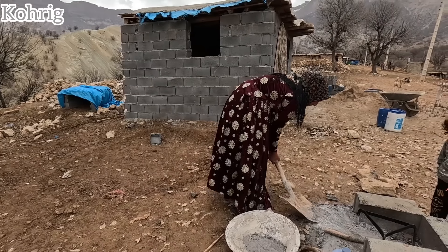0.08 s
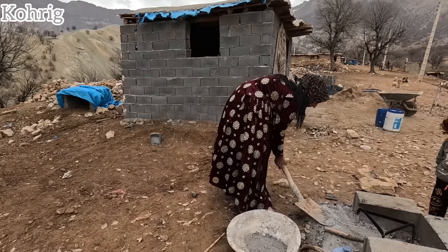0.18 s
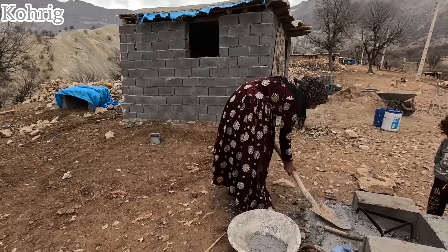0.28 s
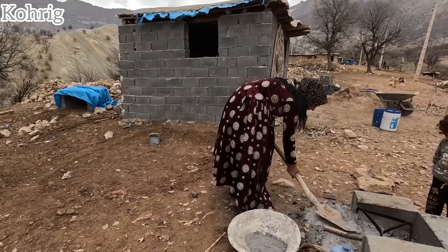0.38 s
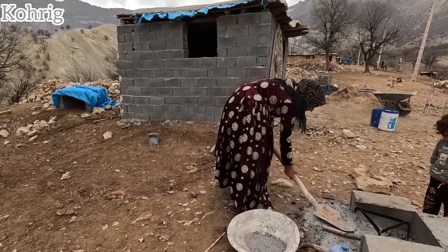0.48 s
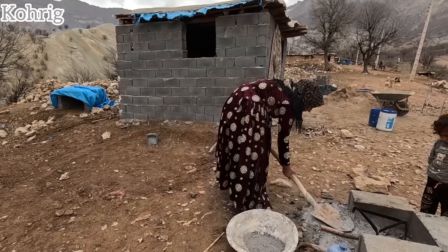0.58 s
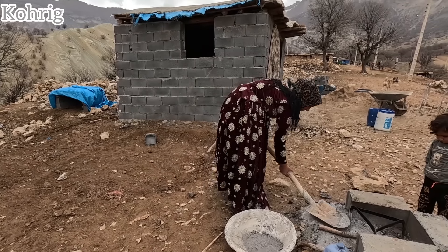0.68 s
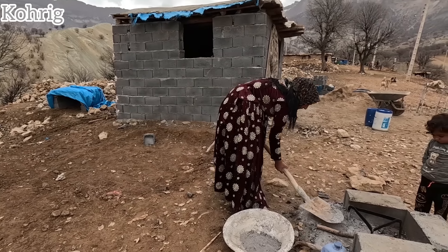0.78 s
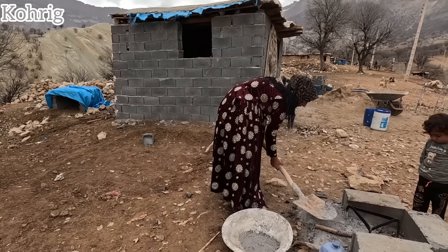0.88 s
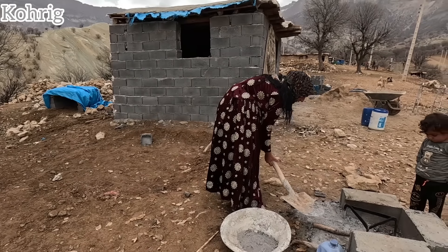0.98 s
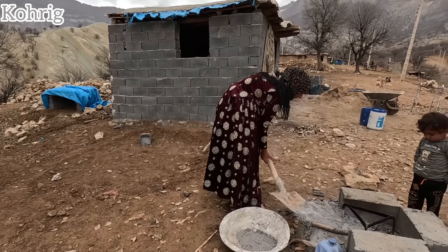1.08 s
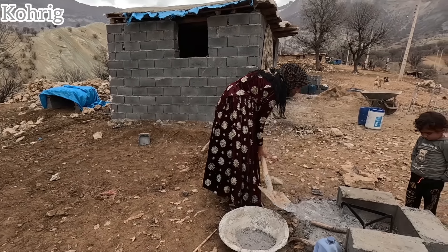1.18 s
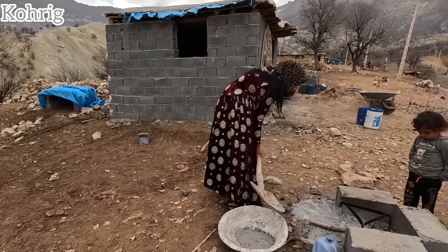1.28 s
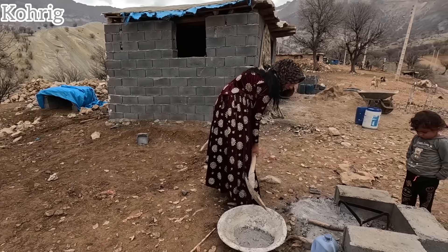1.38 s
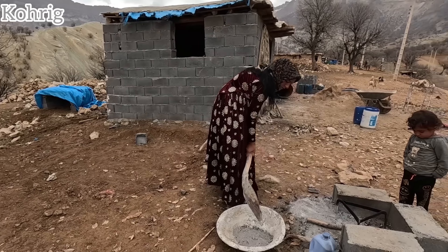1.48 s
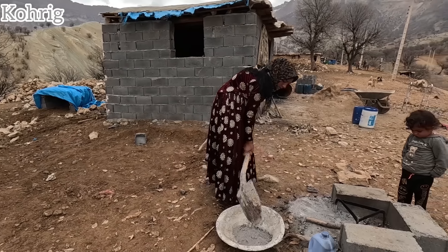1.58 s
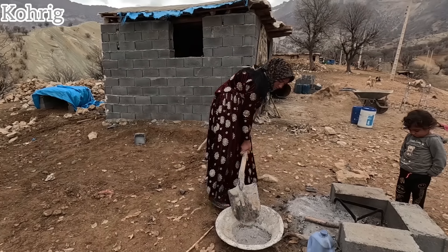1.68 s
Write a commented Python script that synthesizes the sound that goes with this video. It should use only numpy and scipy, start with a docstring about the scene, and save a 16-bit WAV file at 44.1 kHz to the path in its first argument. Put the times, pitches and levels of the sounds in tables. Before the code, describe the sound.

A metal shovel lightly touches gritty ash at 0.12 s, then scrapes in two harsh, ringing strokes from 0.19 to 0.5 s, stones catching the edge, with a faint trickle after. A small knock at 0.65 s meets a soft, deep footfall at 0.7 s. Low wind rumbles outdoors; faint birds call at 1.1-1.5 s; pebbles tick, and ash hiss rises from 1.55 s.

```python
"""At a block hearth in a yard: a steel shovel is pushed through gritty ash close to the microphone.
A touch, two scraping strokes and a trickle of grit are random grains ringing the blade and shaking the hearth.
A ringing knock and ticks of pebbles and crumbs are resonant bursts; a foot thumps the soil in two low tones.
Far birds are gliding tones; wind rumble on the microphone, leaf murmur and the hiss of ash that starts
to pour are shaped noise. The block wall and ground answer the close sounds with short noise tails."""
import sys
import numpy as np
from scipy import signal
from scipy.fft import rfft, irfft, next_fast_len
from scipy.io import wavfile
from scipy.ndimage import map_coordinates

SR = 44100
rng = np.random.default_rng(int(sys.argv[2]) if len(sys.argv) > 2 else 0)


def master(y):
    """Save y as 16-bit WAV."""
    cut = np.clip(np.atleast_2d(y).T, -1, 1)
    pcm = np.round(cut * 32767)  # scale
    wavfile.write(sys.argv[1], SR, pcm.astype(np.int16))


N = 77175
T = np.arange(N) / SR  # time [s]

# Push of the blade, in four parts: touch, first stroke, second stroke, trickle.
# (time [s], low ring [dB], middle ring [dB], fine grit [dB], hearth rumble [dB])
PUSH = [
    [(0.121, -50.5, -59, -50.5, -54.5), (0.125, -60, -55.5, -44.5, -57.5), (0.139, -71, -55, -62, -58.5),
     (0.153, -57.5, -62, -55, -56.5), (0.169, -73.5, -69, -67, -63), (0.18, -70, -72, -61, -63)],
    [(0.187, -44, -50.5, -42.5, -62.5), (0.217, -38, -39.5, -32.5, -51), (0.231, -31.5, -37, -37, -40),
     (0.267, -32, -28.5, -33.5, -40), (0.277, -29, -40, -43, -44.5), (0.283, -28.5, -23, -33, -41.5),
     (0.299, -27, -24.5, -29, -44), (0.305, -30.5, -34, -38, -44), (0.319, -40, -38, -42.5, -44.5),
     (0.327, -34, -32.5, -46.5, -48.5), (0.34, -41.5, -43, -53.5, -50)],
    [(0.343, -39.5, -34, -44, -48.5), (0.369, -38, -34, -32, -57), (0.397, -31, -29.5, -26, -51),
     (0.411, -24, -26.5, -37.5, -47.5), (0.421, -24, -23.5, -26.5, -46), (0.431, -39.5, -36.5, -43, -45),
     (0.437, -28.5, -31, -39, -46), (0.453, -25.5, -40.5, -35.5, -42.5), (0.459, -20, -34.5, -42, -41),
     (0.473, -36, -44, -45, -41.5), (0.51, -58.5, -63.5, -67.5, -65.5)],
    [(0.52, -59, -63.5, -70, -67), (0.532, -56.5, -59, -61, -70), (0.55, -63, -59.5, -62, -72),
     (0.564, -70, -53, -69, -74), (0.576, -68, -62, -67, -75), (0.612, -90, -74, -94, -89.5),
     (0.64, -72.5, -71, -70, -73)],
]
# Ringing modes of the blade: (pitch [Hz], width [Hz], level [dB], extra once tipped for the second stroke [dB])
BLADE_MODES = [(576.3, 28, -4.5, -8.5), (654, 24, -12.5, 5), (726, 30, -9.5, 5), (785.5, 45, -8, 6.5),
               (975, 55, 2, -3), (1124, 45, 1.5, -1), (1255.7, 33, -8, 6.5), (1602, 90, -8.5, 6.5),
               (1684, 45, -5.5, 0), (1966, 110, -2, -4.5), (2303, 220, -7.5, -0.5), (2595, 100, -5, -2.5),
               (3720, 90, -6, -5.5), (4360, 120, -15, 0), (5410, 200, -13, 0), (6020, 100, -15.5, -0.5),
               (6700, 100, -15, 0), (7900, 500, -11.5, -2.5)]
# Colour of the fine grit: (frequency [Hz], relative level per Hz [dB])
GRIT_COLOUR = [(1500, -22.5), (2500, -2.5), (3200, -4), (4200, -3.5), (6500, -11.5), (8200, -11),
               (9500, -20.5), (11400, -25.5), (15500, -32)]
# Colour of the hearth and handle: (frequency [Hz], relative level per Hz [dB])
HEARTH_COLOUR = [(65, -41), (110, -9), (171, 6.5), (276, -9), (500, 0), (650, -30.5), (1100, -120)]
# Stones that catch the edge: (time [s], peak before the microphone [dB], pitch [Hz], push t60 [s], sharpness Q [1])
STONE_CATCHES = [(.1216, -35.5, 7440, 0.024, 1.8), (.1235, -48, 3700, 0.026, 1.5),
                 (.122, -48, 600, .15, 1.7), (.187, -28, 2740, .05, 2.3), (.187, -31.5, 7357, 0.017, 1.4),
                 (.2009, -25, 2840, 0.033, 1.5), (.2129, -21.5, 2600, .05, 2.5),
                 (.2414, -20, 1316, 0.0092, 0.53), (.2622, -17, 1499, .015, .7),
                 (.281, -12, 1300, .06, 0.75), (.2964, -17.5, 3705, .025, 2.5),
                 (.3154, -23.5, 4500, .012, .6), (.3255, -23, 1300, .03, 1.5),
                 (.3461, -22, 1660, 0.023, 1.3), (.3845, -18, 1710, 0.025, 1),
                 (.4034, -17.5, 1299, .025, 0.82), (.4184, -12, 3826, .015, 0.41),
                 (.4374, -18, 1510, 0.024, 0.48), (.4494, -17, 5530, 0.0095, 0.83),
                 (.4544, -14.5, 948, 0.038, 0.94), (.228, -25, 567, .06, 2),
                 (.309, -22.5, 2985, .015, 0.96), (.441, -18.5, 770.4, .08, 3.3),
                 (.459, -23, 790, 0.065, 2.4)]
# The edge squeals as it slides: (start [s], length [s], first pitch [Hz], last pitch [Hz], bend [1],
# level before the microphone [dB], roughness [Hz], swell [1]: small = loudest early)
EDGE_SQUEALS = [(.187, .088, 7500, 8900, 2.2, -45, 350, .8), (.187, .045, 2750, 2650, 1, -38, 250, 1.2),
                (.378, .028, 5000, 5200, 1, -40, 450, 1.3)]
# A ringing knock near .65 s, and ticks of pebbles and crumbs:
# (time [s], peak before the microphone [dB], pitch [Hz], push t60 [s], sharpness Q [1])
KNOCK_AND_TICKS = [(.0405, -52, 7700, .012, .7), (.5626, -37, 1420, .03, 2), (.6548, -47, 2650, .035, 2.4),
                   (.6542, -45, 1060, .08, 4), (.6535, -48, 810, .07, 4), (.653, -48, 620, .08, 4),
                   (.652, -50, 412, .14, 3.5), (1.6541, -58, 450, .02, 1.2), (.6774, -56, 2150, .02, 1.8),
                   (.6908, -54, 1450, .015, 1.4), (.691, -50, 8200, .012, .7), (.7347, -57, 2330, .04, 2.8),
                   (1.0585, -65, 1390, .02, 2.5), (1.099, -63, 1260, .03, 2.2),
                   (1.1797, -59, 1500, .015, 2), (1.1797, -63, 2250, .015, 4),
                   (1.2012, -54, 3800, .02, 1.3), (1.2645, -62, 1500, .02, 1.8),
                   (1.2645, -66, 3150, .03, 3), (1.3039, -58, 1950, .015, 1.5), (1.3144, -56, 6800, .01, 1),
                   (1.496, -58, 1330, .02, 2), (1.6538, -45, 1370, .004, 2.1),
                   (1.6905, -46, 3200, .018, 1.7), (1.6905, -54, 1250, .012, 1.5),
                   (1.6908, -47, 8900, .012, 1.5), (1.7018, -55, 2000, .015, 2.8),
                   (1.7232, -49, 3100, .012, 1.3), (1.7232, -45, 6200, .012, .7),
                   (1.7325, -54, 950, .04, 2.2)]
# Microphone response to close sources: (frequency [Hz], gain [dB])
CLOSE_MICROPHONE = [(8000, -0.5), (9300, -6), (10500, -15.5), (12500, -24.5), (15500, -28)]
# Tones of the packing soil: (settled pitch [Hz], level [dB], t60 [s])
SOIL_TONES = [(28.02, -32, 0.32), (67, -24, 0.26)]
# Crunch under the sole: (time [s], peak [dB], pitch [Hz], push t60 [s], sharpness Q [1])
SOLE_CRUNCH = [(.695, -39, 110, 0.05, 0.96), (.7075, -32, 135, .06, .9), (.7, -49, 295, 0.22, 3.5),
               (.698, -52, 436, 0.17, 2.4), (.701, -58, 720, 0.08, 1.2), (.702, -53, 1150, .06, 2.1)]
# Far bird calls: (start [s], length [s], first pitch [Hz], last pitch [Hz], bend [1],
# level [dB], roughness [Hz], swell [1]: small = loudest early)
BIRD_CALLS = [(1.112, .11, 6450, 5850, 1.1, -74, 100, .45), (1.112, .06, 3150, 3250, 1.1, -82, 250, .5),
              (1.215, .07, 4100, 3700, 1.3, -85, 30, 1), (1.195, .18, 1330, 1203, .5, -72, 6, 1.6),
              (1.33, .155, 1200, 1226, 1.1, -71, 6, 1.7), (1.25, .17, 1620, 1760, .5, -75, 120, .9),
              (1.08, .08, 1280, 1240, 1.1, -78, 200, .6)]
# Decay of the block wall and ground: (frequency [Hz], t60 [s])
WALL_DECAY = [(300, 0.053), (2000, 0.039), (10000, 0.09)]
# Strength of what the wall sends back: (frequency [Hz], gain [dB])
WALL_GAIN = [(300, -22.5), (1500, -16), (5000, -12.5), (9000, -10.5), (13000, -2)]
# Phase between the sides: (frequency [Hz], lead of the left [rad])
LEFT_LEAD = [(100, -0.23), (780, -0.34), (3450, -0.81), (6400, -0.5), (10000, -0.5)]
# Balance between the sides: (frequency [Hz], left over right [dB])
LEFT_LEAN = [(50, -4.5), (150, -.6), (700, -1.8), (1400, -2), (2800, -.7), (5500, -1.9), (10000, -.5)]
# Wind on the microphone: (time [s], buffeting [dB], roar [dB])
WIND_LEVELS = [(0.0, -44, -63.5), (0.146, -59, -61), (0.31, -53, -55), (0.36, -53, -58), (0.492, -55, -69),
               (0.652, -64, -73.5), (0.764, -51, -66), (0.896, -66.5, -75), (1.012, -66, -77.5),
               (1.228, -58, -66.5), (1.378, -53.5, -68.5), (1.472, -51, -77.5), (1.632, -51.5, -68.5),
               (1.75, -53, -66.5)]
# Colours of the wind's buffeting and roar: (frequency [Hz], relative level per Hz [dB])
RUMBLE_COLOUR = [(8.8, -32), (15, -1), (38, 1.5), (70, -9), (80, -9.5), (100, -40), (180, -120)]
ROAR_COLOUR = [(47, -28.5), (80, -3), (97, -13.5), (162, -9), (220, -23.5), (400, -35.5), (520, -63.5),
               (880, -120)]
# The yard: (time [s], far murmur of leaves [dB], hiss of air and falling ash [dB])
YARD_LEVELS = [(0, -72, -78), (.04, -78, -80), (.5, -74, -74), (.62, -73, -73), (.74, -77, -84),
               (.9, -80, -83), (1.05, -78, -82), (1.31, -75, -79), (1.48, -75, -79), (1.54, -74, -72),
               (1.66, -72.5, -71), (1.75, -69, -66.5)]
# Colours of the murmur and the hiss: (frequency [Hz], relative level per Hz [dB])
MURMUR_COLOUR = [(150, -33), (250, -0.5), (685, -5), (818, -8.5), (1290, 0), (2020, -7), (3000, -17),
                 (3900, -47), (6600, -120)]
HISS_COLOUR = [(1180, -32.5), (2000, -4.5), (2240, -9.5), (3200, -1.5), (4110, -6.5), (7610, -1),
               (8880, -7.5), (10500, -18.5), (15500, -39)]

LOW_HZ, HIGH_HZ = 1400, 3300  # bounds of the blade's low, middle and fine modes
GRAINS_PER_S, SIZE_DB, SHARED = 5000, 5, .4  # shared contacts, their size scatter, their share in every layer
OWN_PER_S, OWN_SIZE_DB = 9000, 2.5  # each layer's own grains are denser and more even than the shared ones
SHIFT_DB, SHIFTS_PER_S = 4.5, 40.06  # the moving contact favours now one mode, now another
CLUMP_DB, CLUMPS_PER_S = 2.5, 130  # the ash comes under the edge in clumps
BLOW, WIDEN = 5, 0.74  # first touch against the noise that follows; width factor of each stacked resonance
THUMP_S, THUMP_RISE_S = .6935, 0.0035
STIFFEN, STIFFEN_S = .5, 0.039  # the soil packs: pitch starts lower by this share and recovers
WIND_LEAN_DB = -3.5  # left over right
TOP_HZ = 15700
SIDES = np.c_[[1, -1]]  # left, right


def shovel():
    """Grains under the edge ring the blade's modes, shake the hearth and crackle in the treble."""
    low_db, mid_db, fine_db, hearth_db = curves(np.concatenate(PUSH))
    start_s, end_s = PUSH[0][0][0], PUSH[-1][-1][0]
    tipped = T > PUSH[2][0][0]
    layers = []
    for hz, width, db, tip_db in BLADE_MODES:
        push_db = low_db if hz < LOW_HZ else mid_db if hz < HIGH_HZ else fine_db
        level_db = push_db + db + tip_db * tipped - 6.5 + SHIFT_DB * wobble(SHIFTS_PER_S)
        layers.append((level_db, lambda f, hz=hz, width=width: resonance(f, hz, width)))
    layers.append((hearth_db, lambda f: amp(along(HEARTH_COLOUR, f))))
    layers.append((fine_db - 5.5 + 3.8 * wobble(120), lambda f: amp(along(GRIT_COLOUR, f))))

    common = grains(GRAINS_PER_S, SIZE_DB)
    moving = (T > start_s) & (T < end_s)
    clumps = moving * amp(CLUMP_DB * wobble(CLUMPS_PER_S) - 1)
    scrape = 0
    for level_db, response in layers:
        rub = SHARED * common + (1 - SHARED) * grains(OWN_PER_S, OWN_SIZE_DB)
        steady = np.std(filtered(rub, response))  # so that each layer's level holds whatever its width
        scrape = scrape + filtered(clumps * amp(level_db) * rub, response) / steady
    return scrape + bursts(STONE_CATCHES) + whistles(EDGE_SQUEALS)


def knock_and_ticks():
    """A ringing knock, and ticks of pebbles and crumbs: short pushes through six stacked resonances."""
    return bursts(KNOCK_AND_TICKS, order=6)


def thump():
    """A soft heavy footfall rings the ground in low tones that rise as the soil packs, with a crunch."""
    t = np.maximum(T - THUMP_S, 0)
    turn = 2 * np.pi * (t - STIFFEN * STIFFEN_S * (1 - np.exp(-t / STIFFEN_S)))
    rise = 1 - np.exp(-t / THUMP_RISE_S)
    ground = sum(amp(db - 60 * t / t60) * np.sin(hz * turn) for hz, db, t60 in SOIL_TONES)
    return bursts(SOLE_CRUNCH) + rise * ground


def birds():
    """Far calls: tones that glide, swell and fade."""
    return whistles(BIRD_CALLS)


def wall(close):
    """The block wall and ground answer briefly: noise tails, a different one on each side."""
    hz, _, noise = signal.stft(rng.standard_normal((2, SR // 4)), SR, nperseg=256)
    t60 = along(WALL_DECAY, hz)[:, None]
    t = np.arange(noise.shape[-1]) * 128 / SR  # frames half a window apart
    shaped = noise * amp(-60 * t / t60) * np.sqrt(.1 / t60)  # shorter tails start louder
    tail = signal.istft(shaped, SR, nperseg=256)[1]
    sent = filtered(close, lambda f: amp(along(WALL_GAIN, f)))
    late = np.pad(sent, (100, 0))[None]  # delay in samples
    return signal.fftconvolve(late, tail / np.linalg.norm(tail[0]), axes=1)[:, :N]


def wind():
    """Wind on the microphone: low buffeting and a roar above it, both leaning to the right."""
    buffet_db, roar_db = curves(WIND_LEVELS)
    lean_db = WIND_LEAN_DB / 2 * SIDES
    buffet = amp(buffet_db + 3.5 * wobble(8) + lean_db) * air(RUMBLE_COLOUR, 0.81)
    return buffet + amp(roar_db + 1.3 * wobble(4.4) + lean_db) * air(ROAR_COLOUR, .9)


def yard():
    """Far murmur of leaves and the hiss of air and falling ash: wide shaped noise with wavering levels."""
    murmur_db, hiss_db = curves(YARD_LEVELS)
    murmur = amp(murmur_db + 1.6 * wobble(36)) * air(MURMUR_COLOUR, .6)
    return murmur + amp(hiss_db + 0.66 * wobble(40)) * air(HISS_COLOUR, 0.65)


def grains(per_s, size_db):
    """Single contacts at random moments, a few much larger than the rest; rms 1."""
    hit, size, sign = rng.random((3, N))
    return unit((hit < per_s / SR) * amp(-size_db * np.log(size + 1 / 80)) * (sign - .5))


def bursts(rows, order=3):
    """Short contacts: a blow and dying noise through stacked resonances; more of them, a softer touch."""
    out, t = np.zeros(N + SR), T[:8192]
    f = np.fft.rfftfreq(len(t), 1 / SR)
    for s, db, hz, t60, q in rows:
        push = rng.standard_normal(len(t)) * amp(-60 * t / max(t60, 1e-3))
        push[0] = BLOW * np.sqrt(SR * q / hz / 10)
        width = WIDEN * np.sqrt(order) * hz / q
        ring = irfft(rfft(push) * resonance(f, hz, width) ** order)
        out[round(s * SR):][:len(t)] += amp(db) * ring / np.abs(ring).max()
    return out[:N]


def whistles(rows):
    """Gliding tones, their pitch shaken by their roughness."""
    out = 0
    for s, length, hz0, hz1, bend, db, rough_hz, swell in rows:
        u = np.clip((T - s) / length, 0, 1)
        hz = hz0 + (hz1 - hz0) * u ** bend + rough_hz * wobble(700)
        level = amp(db + 3 + 2 * wobble(60)) * np.sin(np.pi * u ** swell)  # 3 dB: rms to peak of a sine
        out = out + level * np.sin(2 * np.pi * np.cumsum(hz) / SR)
    return out


def air(spectrum, alike):
    """Stereo noise of rms 1; alike is the share common to both sides."""
    a, b = filtered(rng.standard_normal((2, N)), lambda f: amp(along(spectrum, f)))
    turn = np.arccos(np.clip(alike, 0, 1)) / 2
    return unit(np.cos(turn) * a + SIDES * np.sin(turn) * b)


def resonance(f, hz, width):
    """Complex response of one damped mode, 1 at its pitch."""
    return 1j * f * width / (hz * hz - f * f + 1j * f * width)


def filtered(x, response):
    """x times a complex response of frequency."""
    m = next_fast_len(N + SR // 2)
    return irfft(rfft(x, m) * response(np.fft.rfftfreq(m, 1 / SR)), m)[..., :N]


def wobble(rate):
    """A smooth random curve, rate knots a second."""
    return map_coordinates(rng.standard_normal(int(N * rate / SR) + 4), [T * rate])


def curves(rows):
    """One value per sample for each column after the time."""
    s, *cols = np.transpose(rows)
    return [np.interp(T, s, c) for c in cols]


def along(points, hz):
    """(frequency [Hz], value) points joined on a log axis."""
    f, v = np.transpose(points)
    return np.interp(np.log(hz + 1), np.log(f + 1), v)


def amp(db):
    """Decibels to amplitude."""
    return 10 ** (np.asarray(db) / 20)


def unit(x):
    """x scaled to rms 1."""
    return x / np.sqrt(np.mean(x ** 2) + 1e-20)


def ports(f):
    """The two sides of the microphone differ in level and phase."""
    return amp(along(LEFT_LEAN, f) / 2 * SIDES) * np.exp(.5j * along(LEFT_LEAD, f) * SIDES)


def scene():
    """Close shovel, knock and ticks, footfall and birds in stereo, over the wall's answer, wind and yard."""
    close = filtered(shovel() + knock_and_ticks(), lambda f: amp(along(CLOSE_MICROPHONE, f)))
    direct = filtered(close + thump() + birds(), ports)
    return direct + wall(close) + wind() + yard()


def record(dry):
    """The recorder keeps nothing above its band limit."""
    return filtered(dry, lambda hz: hz < TOP_HZ)


dry = scene()
out = record(dry)
master(out)
```